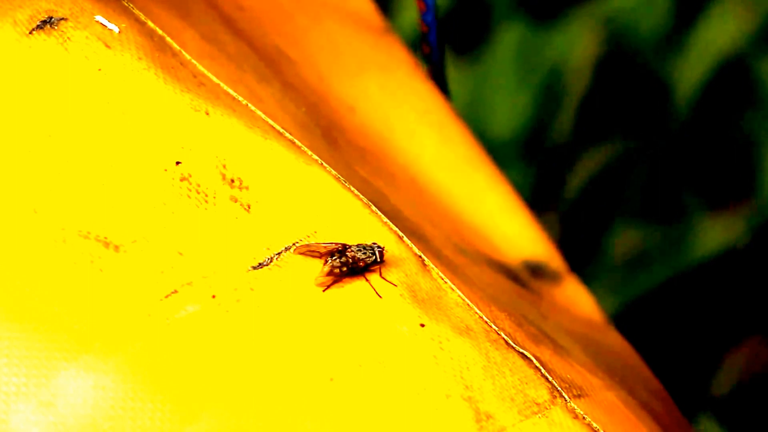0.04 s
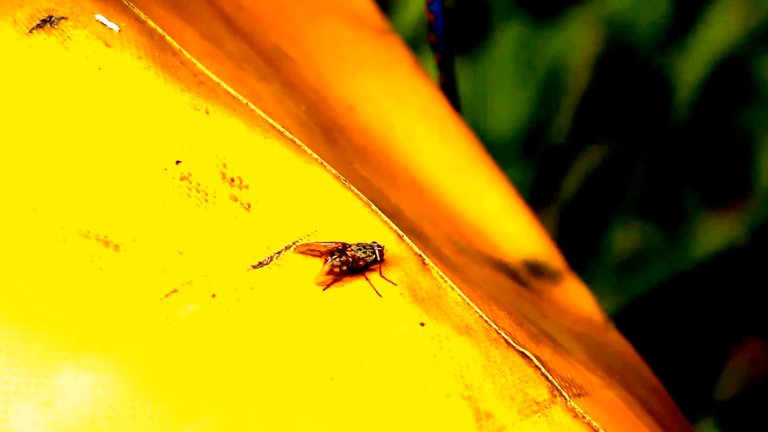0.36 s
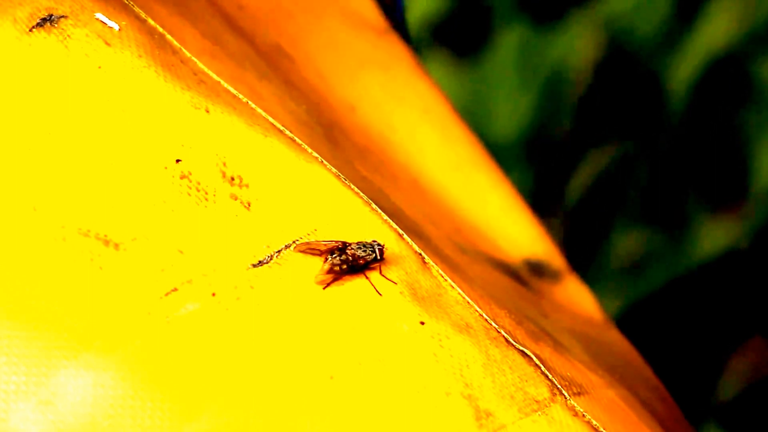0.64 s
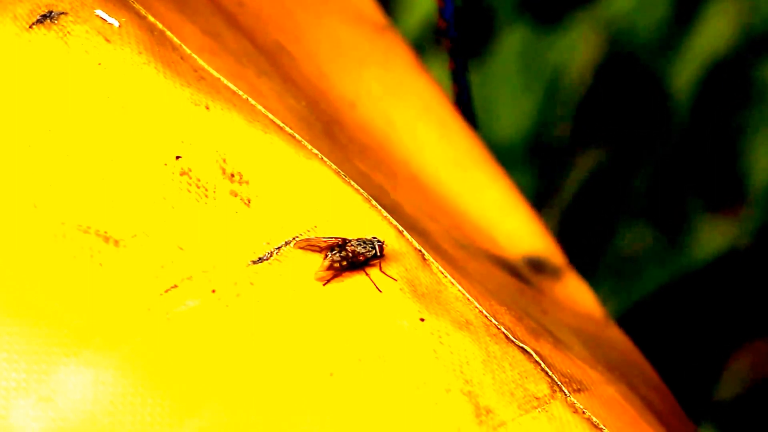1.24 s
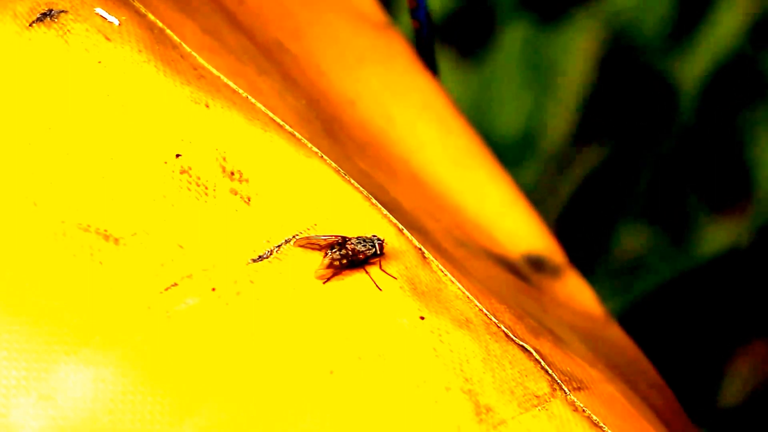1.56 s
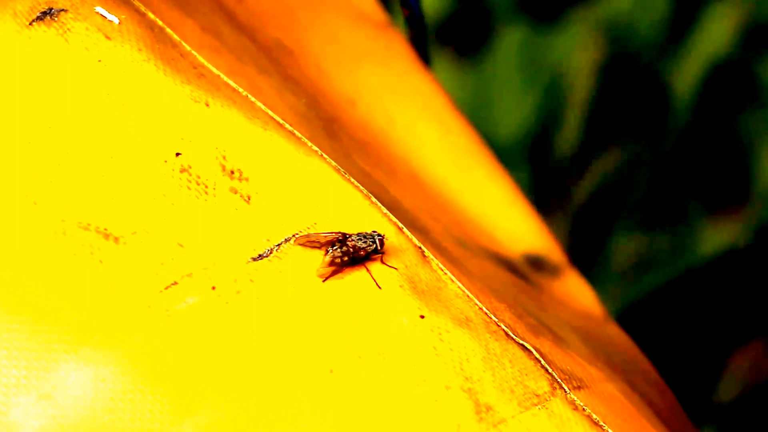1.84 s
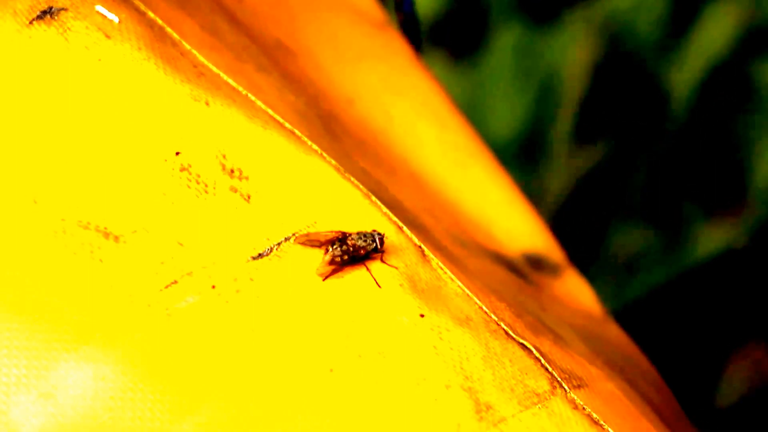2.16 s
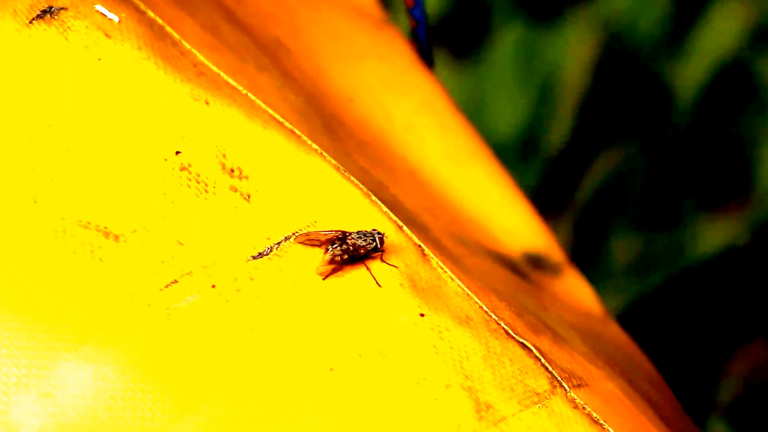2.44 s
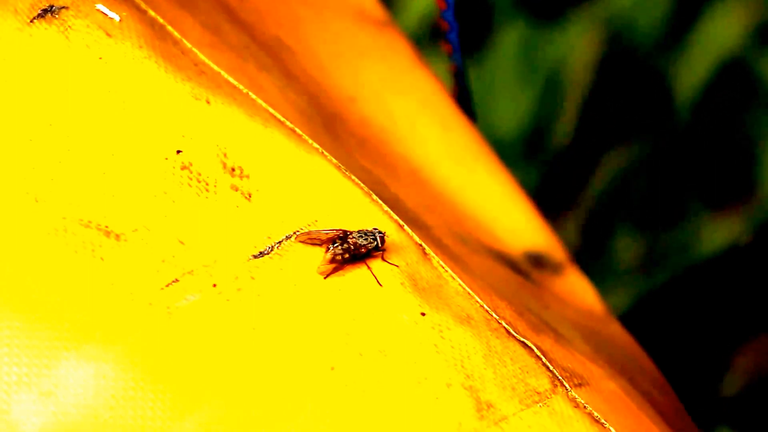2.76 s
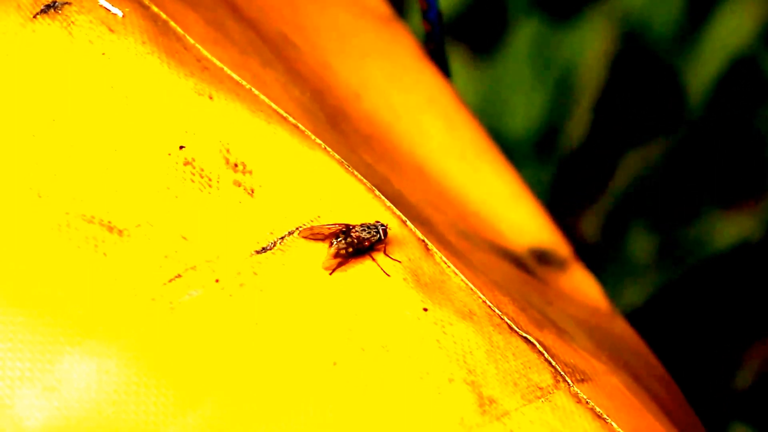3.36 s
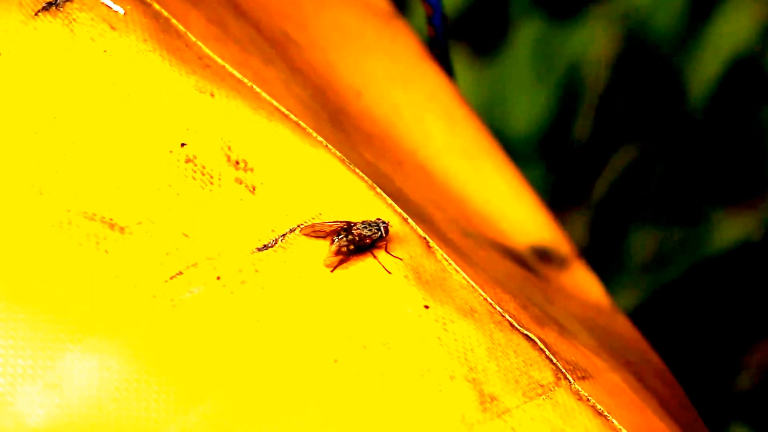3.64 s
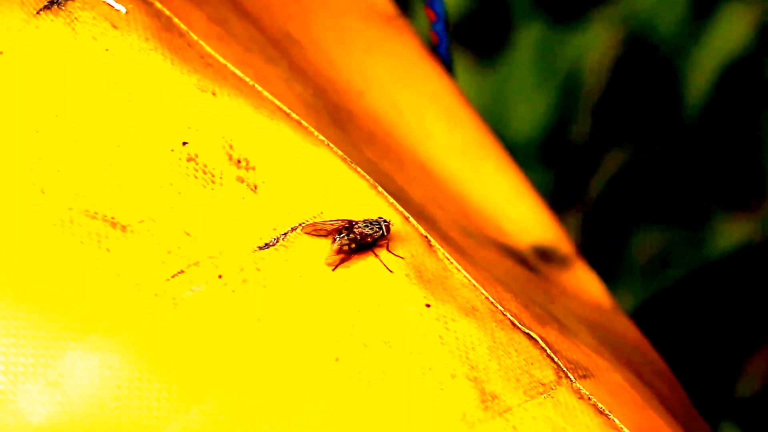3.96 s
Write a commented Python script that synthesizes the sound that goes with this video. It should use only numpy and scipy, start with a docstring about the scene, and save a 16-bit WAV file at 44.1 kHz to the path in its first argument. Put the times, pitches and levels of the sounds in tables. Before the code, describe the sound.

Wind buffets the microphone with low, uneven thumps and rumble. A few light puffs come in the first second and a half, then a stronger gust at about 1.7 seconds. The heaviest buffeting runs from 2.4 to 3.8 seconds, shifting between left and right and peaking near 3 seconds. Throughout, garden leaves hiss softly all around over a faint, dull distant drone.

```python
"""Breezy garden, wind on the microphone

Gusts shed eddies on the microphone's two ports, each a short low thump. All around,
foliage hisses in a steady breeze over a dull far-off drone. The recorder widens the
stereo picture, and its limiter ducks under the hardest thumps."""
import sys
import numpy as np
from scipy import signal
from scipy.fft import rfft, irfft
from scipy.io import wavfile
from scipy.ndimage import uniform_filter1d, minimum_filter1d

SR = 44100
rng = np.random.default_rng(int(sys.argv[2]) if len(sys.argv) > 2 else 0)


def pcm_store(signal):
    """Save signal as 16-bit PCM."""
    levels = np.round(np.clip(np.atleast_2d(signal), -1, 1) * 32767)
    wavfile.write(sys.argv[1], SR, levels.astype(np.int16).T)


N = 176400
T = np.arange(N) / SR
SIDES = np.array([[1], [-1]])  # left, right


def undb(db):
    """Decibels to gain."""
    return 10 ** (np.asarray(db) / 20)


def unit_rms(x):
    """Scale to rms 1."""
    return x / np.sqrt(np.mean(x ** 2))


def equalise(x, curve):
    """Filter by a curve of (Hz, dB) points."""
    hz, db = np.array(curve, float).T
    bin_hz = np.maximum(np.arange(N // 2 + 1) * SR / N, 1)
    gain_db = np.interp(np.log(bin_hz), np.log(hz), db)
    return irfft(rfft(x) * undb(gain_db), N)


def wander(rate_hz):
    """A smooth random drift with a spread near 1."""
    hold = int(SR / rate_hz)
    steps = np.repeat(rng.standard_normal(400), hold)[:N]
    return 1.3 * uniform_filter1d(uniform_filter1d(steps, hold), hold)


def wide_noise(spectrum, width):
    """Diffuse stereo noise whose width depends on frequency."""
    mid, side = (unit_rms(equalise(rng.standard_normal(N), spectrum)) for _ in range(2))
    return mid + equalise(side, width) * SIDES


# Gusts at the microphone. Each row: start in seconds, hold in seconds, level in dB,
# left minus right in dB.
WIND_GUSTS = [(0.01, 0.08, -30, -2.5), (0.265, 0.045, -30.5, -9), (0.345, 0.025, -35, 5),
              (0.93, 0.084, -34, -3.5), (1.334, 0.03, -35.5, -10), (1.486, 0.097, -39, -10),
              (1.68, 0.051, -22, 1), (1.762, 0.13, -28.5, -5), (1.934, 0.16, -38.5, -4.5),
              (2.202, 0.11, -38.5, 3), (2.37, 0.04, -28.5, -2), (2.426, 0.037, -24, -2),
              (2.515, 0.12, -20.5, 2), (2.649, 0.068, -20, 6.5), (2.735, 0.053, -27, 1),
              (2.932, 0.035, -30, -19), (2.988, 0.036, -25.5, -4), (3.028, 0.12, -21.5, 8),
              (3.172, 0.04, -24, 7), (3.276, 0.026, -28.5, 8), (3.34, 0.089, -36.5, -1),
              (3.438, 0.083, -22.5, 5), (3.527, 0.055, -23, 2.5), (3.603, 0.12, -30, 3),
              (3.718, 0.071, -37.5, 19), (3.848, 0.13, -32.5, 3)]


def airflow(side, attack_s=0.021, release_s=0.012, breeze_db=-50.5, swing_db=7.5):
    """Wind strength at one port (side +1 left, -1 right): gusts over a light, fitful breeze."""
    power = undb(breeze_db + swing_db * wander(rate_hz=11)) ** 2
    for start, hold, db, pan_db in WIND_GUSTS:
        rise = np.minimum(T - start, 0) / attack_s
        fall = np.maximum(T - start - hold, 0) / release_s
        power += (np.exp(rise - fall) * undb(db + side * pan_db / 2)) ** 2
    return np.sqrt(power)


def eddies(rows, swing=5.18, skew_rad=0.018):
    """Each passing eddy sucks at the port: a smooth pressure dip between two rebounds."""
    pressure = np.zeros(N)
    for time, db, hz in rows:
        near = slice(max(int((time - 2 / hz) * SR), 0), max(int((time + 2 / hz) * SR), 0))
        cycles = hz * (T[near] - time)
        angle = np.arctan(2 * np.pi * cycles / swing)
        dip = np.cos(angle) ** (swing + 1) * np.cos((swing + 1) * angle + skew_rad)
        taper = np.cos(np.pi * cycles / 4)
        pressure[near] -= undb(db) * dip * taper
    return pressure


def turbulence(side, count=1400, strong_wind_db=-14, strong_wind_hz=124.7):
    """A stream of small eddies at one port, shorter and stronger as the wind rises."""
    flow = airflow(side)
    scatter_db, detune = rng.standard_normal((count, 2)).T
    slots = np.arange(count) + rng.uniform(0, 10.175, count)
    arrivals = (slots * N / count).astype(int) % N
    octaves = 0.026 * (20 * np.log10(flow[arrivals]) - strong_wind_db) + 0.36 * detune
    stream = eddies(zip(arrivals / SR, scatter_db, strong_wind_hz * 2 ** octaves))
    running_rms = np.sqrt(uniform_filter1d(stream ** 2, SR // 10) + 1e-9)
    return flow * stream / running_rms


# Strong eddies that thump one port. Each row: time in seconds, peak in dB before EQ,
# centre frequency in Hz.
LEFT_THUMPS = [(.021, -16, 144), (.344, -12.5, 168), (.395, -20.5, 126), (1.365, -20, 140),
               (1.55, -23, 121), (1.685, -14, 106), (2.582, -6.5, 123), (2.692, 2, 171), (2.698, -25, 191),
               (2.77, -8, 126), (3.029, -17, 108), (3.048, -2, 137), (3.061, -1, 154), (3.089, -7.5, 190),
               (3.135, -11, 146), (3.157, -6, 170), (3.225, -9.5, 135), (3.443, -10, 106),
               (3.502, -0.5, 197), (3.621, -4, 131), (3.777, -7, 127)]
RIGHT_THUMPS = [(.018, -14, 157), (.026, -21, 141), (.275, -16.5, 115), (.768, -34, 110),
                (.981, -10.5, 120), (1.625, -12.5, 120), (1.684, -4, 148), (1.698, -6, 167),
                (1.725, -10, 150), (1.738, -8, 188), (1.76, -8.5, 146), (1.78, -7.5, 138),
                (1.807, -10, 118), (1.841, -14, 110), (1.871, -13, 120), (2.065, -23, 106),
                (2.39, -22, 110), (2.458, -11, 132), (2.501, -7, 141), (2.514, -9.5, 171), (2.543, -9, 151),
                (2.582, -7, 118), (2.614, -5.5, 167), (2.677, -5, 158), (2.925, -13.5, 128),
                (2.946, -9, 112), (2.999, -9, 99), (3.035, 4.5, 177), (3.487, -9, 135), (3.536, -11, 133),
                (3.694, -10, 130)]
# Tone of the wind rumble and thumps, slightly stronger near 150 Hz. Each row: frequency
# in Hz, gain in dB.
WIND_TONE = [(15, -19), (30, 3), (55, 2.5), (80, 3.2), (120, -0.5), (149, 2.5), (175, -2), (230, 1),
             (320, -2.5), (600, 9), (1500, 33)]


def buffeting(crossfeed=0.41):
    """Wind on the two ports; stereo widening mirrors each into the other channel, inverted."""
    left = turbulence(side=1) + eddies(LEFT_THUMPS)
    right = turbulence(side=-1) + eddies(RIGHT_THUMPS)
    wind = equalise(np.array([left, right]), WIND_TONE)
    return wind - crossfeed * wind[::-1]


# Tone of the leaf hiss. Each row: frequency in Hz, relative level in dB.
LEAF_TONE = [(710, -11), (1200, 1.5), (1410, -0.5), (1690, 0), (1920, -1.5), (2570, -3), (2800, -3),
             (5090, -5), (8880, -15), (15500, -29)]
# Its stereo width, widest at the top. Each row: frequency in Hz, side minus mid in dB.
LEAF_WIDTH = [(1300, -5), (2400, -5), (4400, -6), (6300, -2.5), (8100, -.5), (10500, 1.5), (15000, 1)]
# The slow stir of the foliage. Each row: time in seconds, gain in dB.
LEAF_SWELL = [(0, -0.8), (1.0, -0.36), (1.6, 0), (2.1, 1.4), (2.55, 0.5), (2.8, 0.2), (3.3, 0.5), (4, 0)]


def foliage(gain_db=-47, flicker_db=0.42, low_cut_hz=1250, pan_db=0.35):
    """Countless leaves merge into a smooth hiss that flickers a little and swells slowly."""
    hiss = wide_noise(LEAF_TONE, LEAF_WIDTH) * undb(gain_db + flicker_db * wander(rate_hz=24))
    low_cut = signal.butter(2, low_cut_hz, "high", fs=SR, output="sos")
    swell_db = np.interp(T, *np.array(LEAF_SWELL).T)
    return signal.sosfilt(low_cut, hiss) * undb(swell_db + SIDES * pan_db / 2)


# Tones of the far-off wash and of its hum around 300 Hz. Each row: frequency in Hz,
# relative level in dB.
WASH_TONE = [(30, -8.5), (70, -4), (110, 0), (165, 1), (208, -6), (250, -1), (282, -4), (320, -9.5),
             (365, -12.5), (420, -8), (510, -12.5), (640, -9), (710, -9.5), (780, -9.5), (850, -10.5),
             (888, -6), (920, -9), (990, -8.5), (1120, -13), (1600, -19), (3000, -52.5)]
HUM_TONE = [(200, -16), (250, -4.5), (280, 4.5), (320, -3.5), (365, -1), (430, -15.5), (520, -47),
            (900, -59)]
# The narrow stereo width of both. Each row: frequency in Hz, side minus mid in dB.
DRONE_WIDTH = [(100, -14.5), (200, -23), (380, -10), (700, -9.5), (1300, -11.5)]
# The hum's rise and fall. Each row: time in seconds, gain in dB.
HUM_SWELL = [(0, -46), (.6, -49), (1.2, -48), (1.8, -52.5), (2.4, -50.5), (3.2, -47), (3.6, -43),
             (3.85, -40.5), (4, -52.5)]


def drone(wash_db=-42.5, drift_db=0.5, pan_db=0.8):
    """A dull far-off wash with broad humming resonances that swell and sink on their own."""
    wash = wide_noise(WASH_TONE, DRONE_WIDTH) * undb(wash_db + drift_db * wander(rate_hz=5.38))
    swell_db = np.interp(T, *np.array(HUM_SWELL).T)
    hum = wide_noise(HUM_TONE, DRONE_WIDTH) * undb(swell_db)
    return (wash + hum) * undb(SIDES * pan_db / 2)


def scene():
    """Wind on the microphone up front, leaves all around, the drone far behind."""
    return buffeting() + foliage() + drone()


def limiter(x, ceiling_db=-0.6, attack_s=0.0023, hold_s=0.041, release_s=0.011):
    """Both channels duck just ahead of the hardest thumps, hold and recover."""
    peak_db = 20 * np.log10(np.abs(x).max(axis=0) + 1e-9)
    duck_db = np.minimum(ceiling_db - peak_db, 0)
    attack, hold = int(attack_s * SR), int(hold_s * SR) // 2 * 2 + 1
    held_db = minimum_filter1d(duck_db, hold, origin=hold // 2 - attack)  # looks ahead by the attack
    decay = np.exp(-1 / (release_s * SR))
    gain_db = np.minimum(held_db, signal.lfilter([1 - decay], [1, -decay], held_db))
    for _ in range(2):  # round the corners
        gain_db = uniform_filter1d(gain_db, attack)
    return x * undb(gain_db)


def record(dry, fade_in_s=0.004, high_cut_hz=15400):
    """Limit the mix, fade it in and cut the top steeply."""
    limited = limiter(dry) * np.minimum(T / fade_in_s, 1)
    high_cut = signal.ellip(12, 0.2, 80, high_cut_hz, fs=SR, output="sos")
    return signal.sosfilt(high_cut, limited)


dry = scene()
out = record(dry)
pcm_store(out)
```